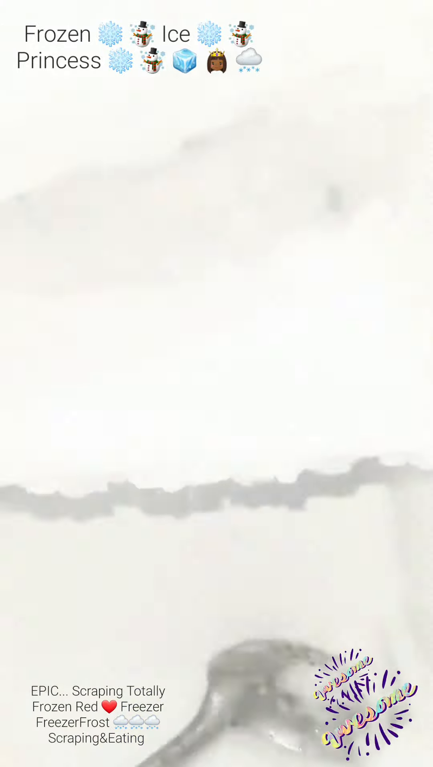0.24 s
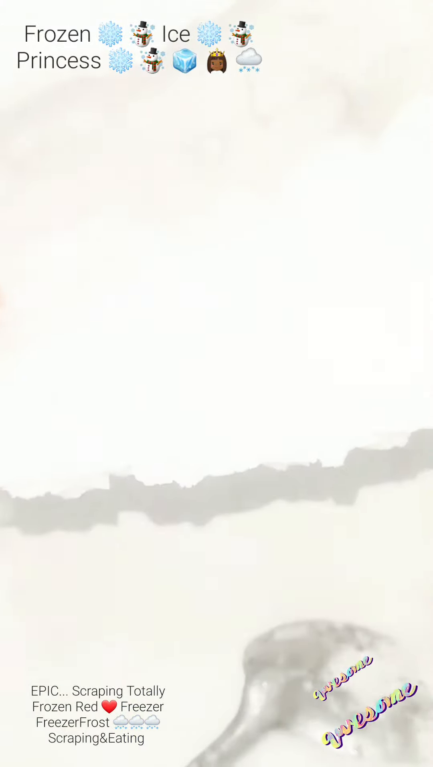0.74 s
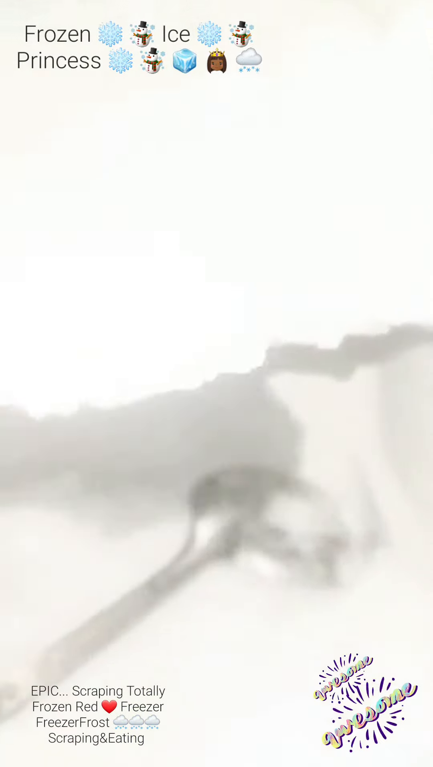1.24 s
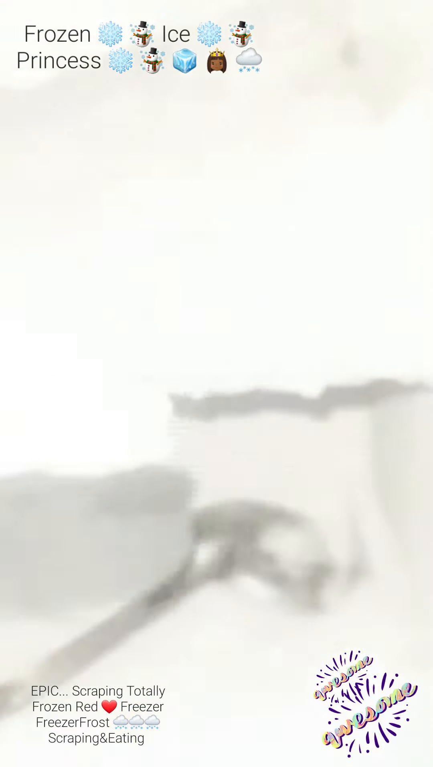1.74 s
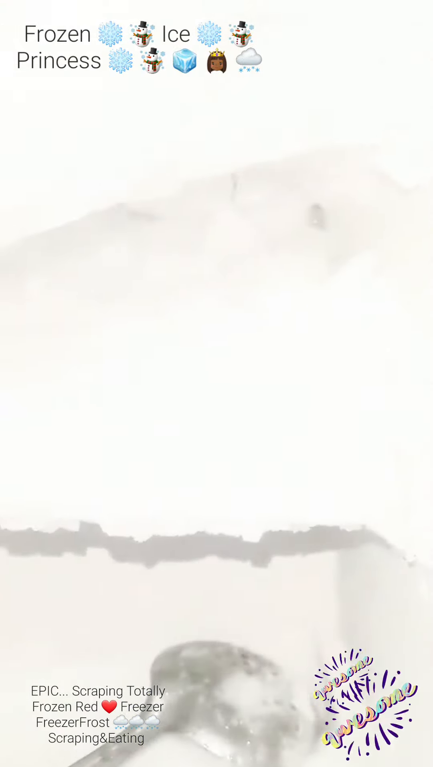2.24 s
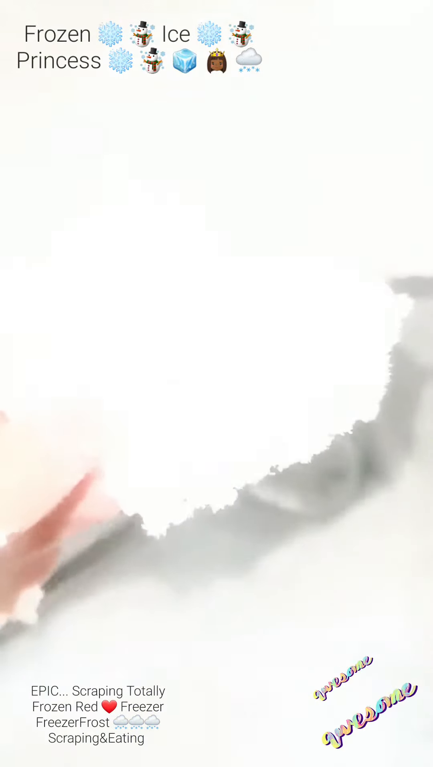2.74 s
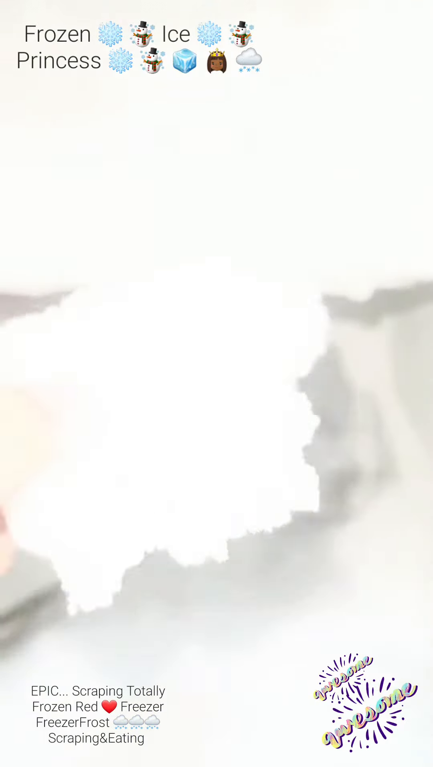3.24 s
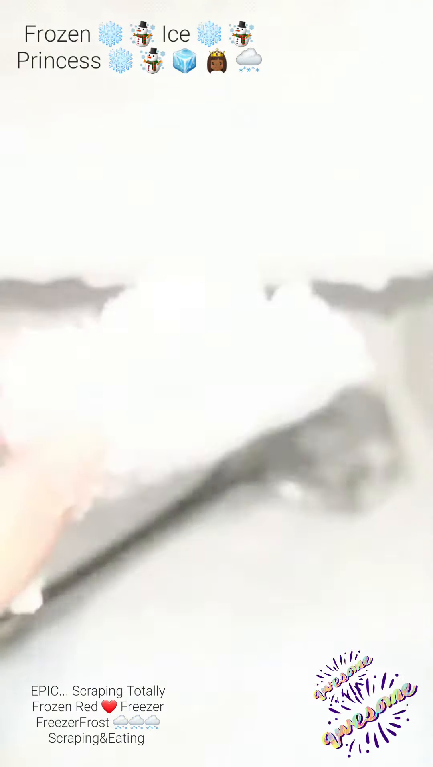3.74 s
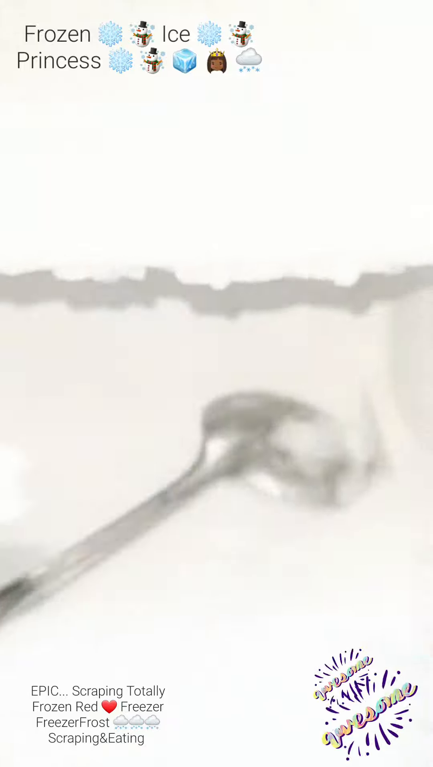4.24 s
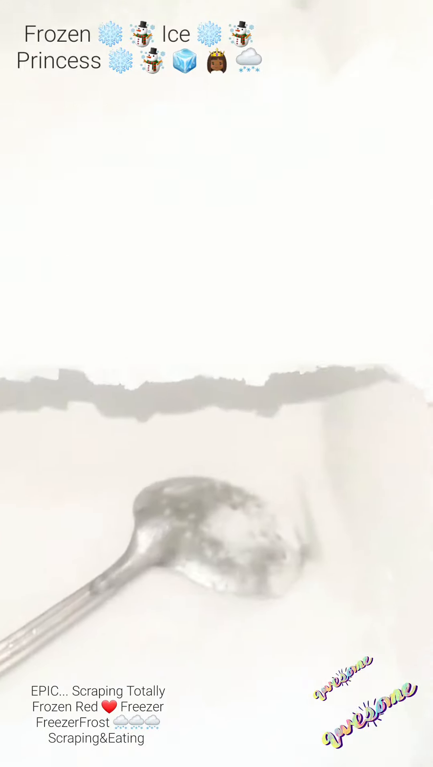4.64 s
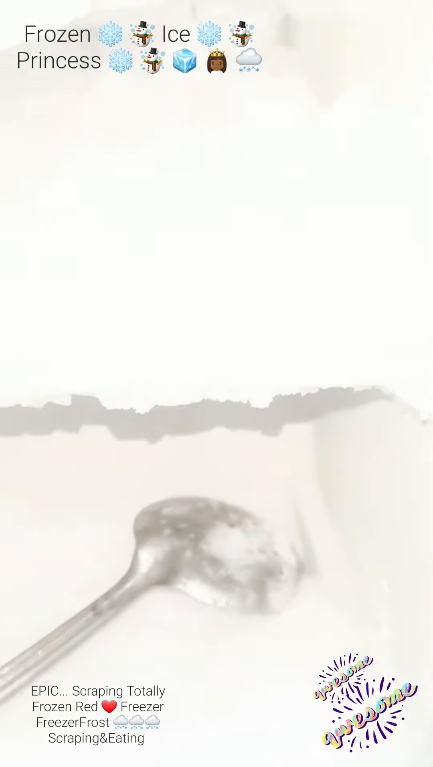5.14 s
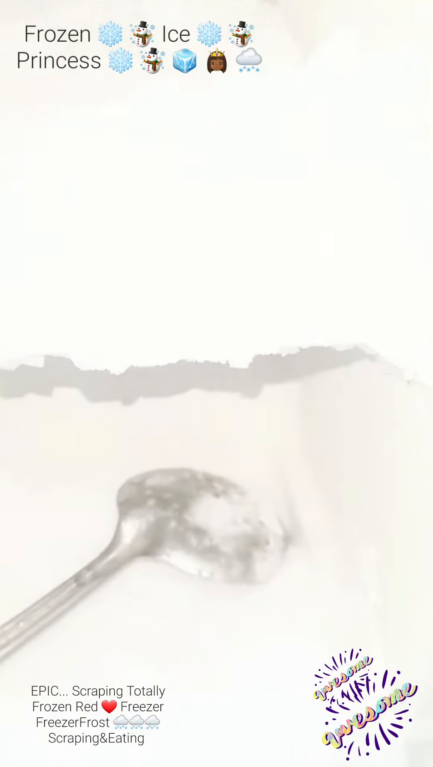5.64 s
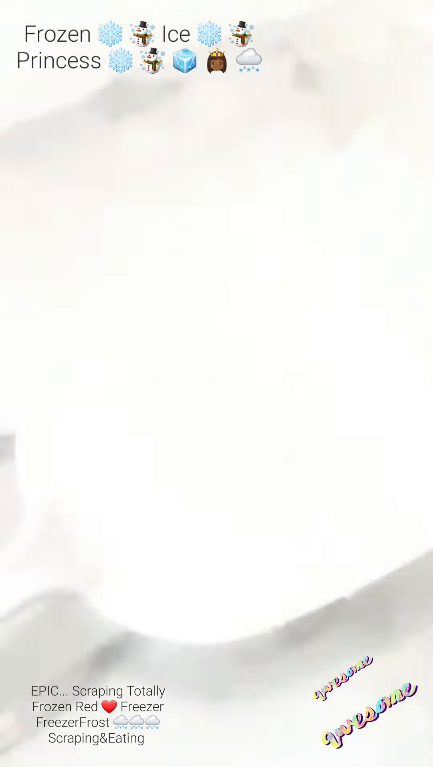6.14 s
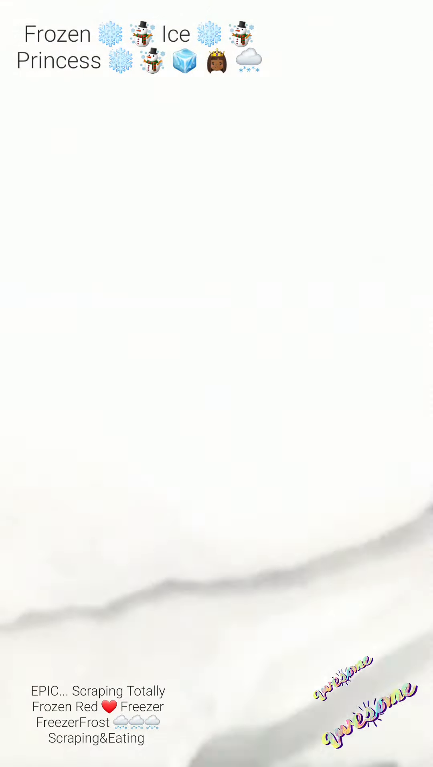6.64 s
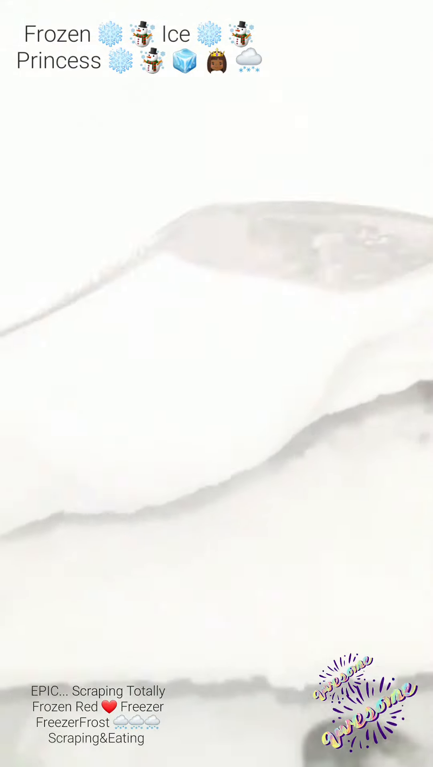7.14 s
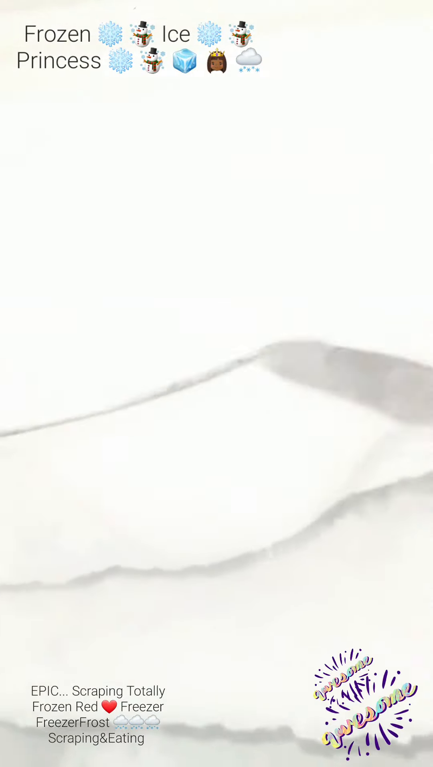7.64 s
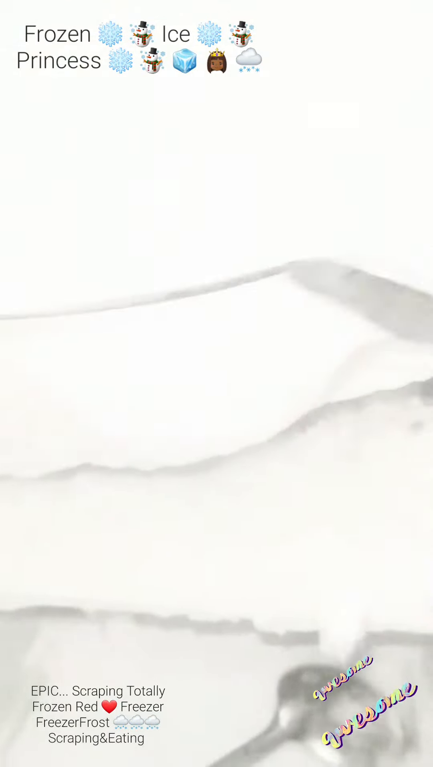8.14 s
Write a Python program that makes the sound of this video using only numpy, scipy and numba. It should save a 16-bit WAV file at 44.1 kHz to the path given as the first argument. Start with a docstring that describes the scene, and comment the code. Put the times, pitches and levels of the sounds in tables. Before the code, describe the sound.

Close to the microphone, a metal spoon works at thick freezer frost. It starts at once with a soft bump, chattering spoon taps and a crisp scrape, followed by a crunchy dig with a short squeak around 0.3-0.5 seconds. Activity thins from about 0.6 to 2, with a low wavering groan near 0.9, a light hiss near 1.1 and near quiet afterwards. From 2.1 the strokes return, quickening from 2.6 to 5.8: gritty crunches, brittle snaps, sprays of hissing crystals and small gliding squeaks, with tiny pauses. A strong crunch lands near 6.1, and shrill chirps cluster around 6.5. Low bumps come at 6.7 and 7.3. Hard chops strike the wall at 6.9, then repeatedly from 7.4 to the end, knocking, juddering and ringing dully. A faint freezer rush and thin, unsteady whine run throughout, with tight short reflections.

```python
"""Scraping frost in a freezer

A metal spoon scrapes thick frost, close to a phone, in quick strokes with short pauses.
Bursts of random clicks are the breaking ice: a hiss when it skims, a crunch when it digs.
Gliding tones squeak where packed frost slips. Towards the end hard chops ring the freezer wall.
Taps, bumps and a groan join in; filtered noise and a thin whine are the freezer, running throughout."""
import sys
import numpy as np
from scipy import signal
from scipy.fft import rfft, irfft
from scipy.io import wavfile
from scipy.ndimage import uniform_filter1d
from numba import njit

SR = 44100
rng = np.random.default_rng(int(sys.argv[2]) if len(sys.argv) > 2 else 0)


def wav_record(signal):
    """Record a signal, one row per channel, as 16-bit PCM in the file named by sys.argv[1]."""
    frames = np.transpose(np.atleast_2d(signal))
    bounded = np.clip(frames, -1, 1)
    # unit amplitude maps onto the largest positive 16-bit level
    quanta = np.round(bounded * 32767).astype(np.int16)
    wavfile.write(sys.argv[1], SR, quanta)


N = 370440  # length in samples
TIME = np.arange(N) / SR  # seconds


def undb(db):
    """Turn decibels into gain."""
    return 10 ** (np.asarray(db) / 20)


def unit(x):
    """Scale to an rms of 1."""
    return x / np.sqrt(np.mean(x ** 2))


def add(track, start_s, sound):
    """Mix a sound into the track from a given time."""
    start = max(int(start_s * SR), 0)
    part = sound[:max(N - start, 0)]
    track[start:start + len(part)] += part


def fade(t, t60):
    """Die away exponentially, losing 60 dB in t60 seconds."""
    return np.exp(-np.log(1000) * t / t60)


def walk(rate, size=N):
    """Wander at random around 0 with an rms of 1, through `rate` new points a second."""
    knots = rng.standard_normal(int(size / SR * rate) + 2)
    position = np.arange(size) / SR * rate
    return unit(np.interp(position, np.arange(len(knots)), knots))


def colour(x, points, size=2048):
    """Filter to a given spectrum without looking ahead; white noise keeps its power."""
    hz, db = np.transpose(points)
    grid = np.maximum(np.fft.rfftfreq(size, 1 / SR), 1)
    gain = undb(np.interp(np.log(grid), np.log(hz), db))
    # folding the cepstrum forward puts the filter's energy as early as possible
    cepstrum = irfft(np.log(gain))
    cepstrum[1:size // 2] *= 2
    cepstrum[size // 2 + 1:] = 0
    response = irfft(np.exp(rfft(cepstrum)))
    return signal.fftconvolve(x, response / np.linalg.norm(response))[:N]


def ring(modes, shift_hz=0):
    """A struck object sounds several fading tones at once, each moved by its shift."""
    t = TIME[:SR // 5, None]
    hz, t60, db = np.transpose(modes)
    tones = np.cos(2 * np.pi * (hz + shift_hz) * t)
    return np.sum(undb(db) * fade(t, t60) * tones, axis=1)


# Pieces of crust that snap off: start_s, crunch_db, hiss_db (before the frost colours)
CRUST_CRACKS = [(0.026, -17, -28.5), (0.091, -28, -24), (0.336, -15.5, -15.5), (0.429, -13, -38),
                (1.009, -29, -18), (1.256, -55, -42), (1.875, -39.5, -46), (1.888, -39.5, -54),
                (2.053, -38, -22), (2.088, -28, -32), (2.109, -19, -25), (2.389, -15.5, -27),
                (2.426, -44, -19), (2.813, -12.5, -20.5), (3.059, -23, -35), (3.081, -24.5, -32),
                (3.149, -10.5, -35), (3.413, -23, -27.5), (3.536, -16, -32.5), (3.845, -43, -26.5),
                (4.052, -25, -58), (4.163, -25.5, -33), (4.213, -20.5, -40), (4.538, -25, -20.5),
                (4.552, -18.5, -33), (4.632, -19, -20), (4.755, -30, -27), (4.803, -12.5, -20),
                (5.075, -29, -22), (5.222, -21.5, -25.5), (5.247, -29.5, -25), (5.353, -14, -20),
                (5.752, -19.5, -19), (5.973, -31.5, -38.5), (6.148, -51, -42), (6.217, -16, -30.5),
                (6.26, -18.5, -37), (6.293, -15.5, -20), (6.504, -16, -31), (6.643, -16.5, -41),
                (6.884, -27, -23), (7.356, -19, -20), (7.605, -19.5, -23), (7.845, -15.5, -35),
                (8.14, -17, -40), (8.289, -17, -27)]
# Ringing of the hard crust under a deep dig: pitch_hz, t60_s, level_db (relative)
CRUST_RING = [(690, 0.032, -7.5), (1386, .018, -2), (1760, 0.017, 3.5)]
# Colours of the deep grinding, the crunch and the hiss: frequency_hz, level_db (relative)
GRINDING_COLOUR = [(40, -28), (120, -16), (220, -3.5), (410, 4.5), (600, 1), (900, -5), (1300, -7.5),
                   (2500, -48.5)]
CRUNCH_COLOUR = [(350, -18), (700, -6), (1000, -1), (1350, 2.5), (1800, 2), (2300, 2), (3300, 1.5),
                 (4300, 1.5), (5000, -13), (7000, -12.5), (10000, -30), (16000, -32)]
HISS_COLOUR = [(1500, -24), (3500, -11), (5000, -14.5), (6500, -12), (8300, -10), (9400, -0.5), (10200, 1),
               (11200, -3.5), (12500, -12), (15500, -19.5)]


def frost():
    """The edge advances in tiny jerks; each jerk breaks coarse and fine crystals together."""
    grinding_db, crunch_db, hiss_db = effort()
    clumps = undb(2.3 * walk(rate=500)) * np.sqrt(jerks())
    coarse = grains(rate=2500, spread_db=2.0, clumps=clumps, even_s=0.021)
    fine = grains(rate=7000, spread_db=2.8, clumps=clumps, even_s=0.028)
    crunch = hollow(coarse + chips(), grinding_db - crunch_db) * undb(crunch_db - 7.0)
    hiss = fine * undb(hiss_db - 0.57)
    for start_s, snap_db, spray_db in CRUST_CRACKS:
        add(crunch, start_s, undb(snap_db) * fracture(t60=0.063, tail_db=-12.5))
        add(hiss, start_s, undb(spray_db) * fracture(t60=0.059, tail_db=0.5))
    grinding = coarse * undb(grinding_db)
    crust = ring(CRUST_RING)
    crust_sound = signal.fftconvolve(grinding, crust / np.linalg.norm(crust))[:N]
    body = undb(1.5) * colour(grinding, GRINDING_COLOUR) + undb(-3.5) * crust_sound
    return body + colour(crunch, CRUNCH_COLOUR) + colour(hiss, HISS_COLOUR)


# Strokes of the spoon: full_push_start_s, run_in_s, push_s, let_go_s,
# grinding_db, crunch_db, hiss_db (levels half-way through the push, before trims and colours)
SPOON_STROKES = [(0.0,.004,0.0092,0.1,-35.5,-24,-21.5), (.198,0.25,0.026,0.31,-80,-51.5,-46),
                 (.339,0.019,0.078,0.08,-35.5,-20,-17), (.395,.015,0.05,0.13,-26.5,-24,-32.5),
                 (.669,0.099,.006,0.4,-66,-42.5,-41.5), (.899,0.21,0.22,0.39,-54.5,-40.5,-29),
                 (1.115,0.036,0.0098,0.085,-61,-51,-28), (1.41,0.067,0.057,0.049,-64,-60,-56),
                 (1.92,0.17,0.12,.1,-59,-57,-55.5), (2.093,0.1,0.168,0.02,-46,-22.5,-18.5),
                 (2.316,0.085,0.062,0.41,-47.5,-27,-18), (2.609,0.088,0.0083,0.057,-28.5,-19.5,-21.5),
                 (2.67,0.008,0.028,.06,-45.5,-35,-32.5), (2.817,0.12,.1,0.046,-33,-17,-28),
                 (3.078,0.14,0.0039,0.0097,-42,-26,-33.5), (3.137,0.045,0.036,.11,-29,-13.5,-23.5),
                 (3.34,0.058,0.15,.08,-44,-35,-40.5), (3.417,0.034,0.085,0.082,-25,-15.5,-28.5),
                 (3.701,0.03,0.012,0.049,-25.5,-16.5,-28), (3.745,0.057,0.025,0.026,-47,-20.5,-25),
                 (3.851,0.015,0.046,0.028,-52,-31.5,-37), (3.94,0.037,0.036,0.084,-33.5,-15,-26),
                 (4.092,0.013,0.015,0.03,-36,-18,-26), (4.175,0.049,0.014,0.095,-33,-14.5,-21.5),
                 (4.325,0.087,0.033,0.27,-52,-38.5,-38.5), (4.425,0.042,0.0025,0.036,-29,-17.5,-24.5),
                 (4.535,0.0043,0.051,0.046,-61,-30,-29), (4.635,0.07,.03,0.1,-48,-15.5,-19),
                 (4.831,0.12,0.048,0.22,-37.5,-20.5,-15.5), (4.927,0.054,0.047,0.11,-63,-30,-18),
                 (5.08,0.04,0.0076,0.095,-59,-31.5,-20), (5.16,0.035,0.023,0.11,-34.5,-15,-19),
                 (5.353,0.014,0.049,0.07,-33.5,-17.5,-27), (5.445,0.2,0.092,0.027,-65,-44,-31.5),
                 (5.584,0.021,0.0025,0.02,-23.5,-16.5,-24), (5.7,0.18,0.039,0.14,-35,-20,-17),
                 (6.07,0.073,0.012,0.062,-28,-10.5,-22.5), (6.216,0.012,0.002,.031,-26.5,-19,-23.5),
                 (6.291,0.03,0.028,0.06,-41,-17,-20), (6.488,0.077,0.066,0.029,-46.5,-19,-23.5),
                 (6.581,0.0045,0.043,0.11,-51,-21,-24.5), (6.705,0.076,0.0059,0.032,-41,-37.5,-32.5),
                 (6.812,0.1,0.0093,0.034,-46,-26,-32), (7.094,0.082,0.092,.04,-48,-37,-26),
                 (7.197,0.066,0.0088,0.049,-24,-14,-26.5), (7.352,0.0058,0.0047,0.14,-67,-25,-21),
                 (7.71,0.054,0.0073,0.029,-47,-18,-23.5), (7.939,.047,0.011,0.15,-48,-22,-16.5),
                 (8.103,0.057,0.0098,0.11,-55,-40,-23.5)]
# Each of these three has the columns grinding_db, crunch_db, hiss_db:
# gained over a stroke's run-in and lost over its let-go
EDGE_CHANGE = (37, 33.5, 31.5)
# change over the push, as the edge sinks in
DIG_CHANGE = (4.5, -1, -2.5)
# level of loose frost settling between strokes
LOOSE_FROST = (-73, -71.5, -70.5)
CHOP_RUN_IN_S, CHOP_PUSH_S, CHOP_HISS_DB = 0.014, 0.055, -19.5


def effort():
    """Every stroke runs in, pushes deeper and lets go, giving three levels in dB; overlaps add up."""
    strokes = list(SPOON_STROKES)
    for start_s, let_go, _, grinding_db, crunch_db in WALL_CHOPS:
        levels = (grinding_db, crunch_db, CHOP_HISS_DB)
        strokes.append((start_s, CHOP_RUN_IN_S, CHOP_PUSH_S, let_go, *levels))
    t = TIME[::32]  # levels move slowly, so every 32nd sample is enough
    power = undb(LOOSE_FROST)[:, None] ** 2
    for start_s, run_in, push, let_go, *layer_db in strokes:
        before = np.maximum(start_s - t, 0) / run_in
        after = np.maximum(t - start_s - push, 0) / let_go
        depth = np.clip((t - start_s) / push, 0, 1) - 0.5
        stroke_db = np.array(layer_db)[:, None] + np.outer(DIG_CHANGE, depth)
        stroke_db = stroke_db - np.outer(EDGE_CHANGE, before + after)
        power = power + undb(stroke_db) ** 2
    return [np.interp(TIME, t, 10 * np.log10(layer)) for layer in power]


def jerks(rate=170, t60=0.033, stuck=0.5):
    """The edge sticks and breaks free unevenly: the crackle leaps up each time and dies away."""
    slips = (rng.random(N) < rate / SR) * rng.exponential(size=N)
    return stuck + signal.fftconvolve(slips, fade(TIME[:SR // 20], t60))[:N]


def grains(rate, spread_db, clumps, even_s):
    """Unequal snaps come in clumps; their power is evened out over even_s so the level follows the strokes."""
    chance, size = rng.random(N), rng.exponential(size=N)
    sign = rng.choice([-1, 1], N)
    snaps = (chance < rate / SR) * sign * undb(spread_db * np.minimum(size, 5)) * clumps
    width = max(int(even_s * SR), 2)
    power = uniform_filter1d(uniform_filter1d(snaps ** 2, width), width // 2)
    return snaps / np.sqrt(np.maximum(power, 0) + 1e-6)


def chips(rate=70, spread_db=2.5, size_db=16, hz=2300, t60=0.0029):
    """Coarser chips give way at random moments: each is a sharp click with a pitch of its own."""
    out, t = np.zeros(N), TIME[:SR // 150]
    for when, size, pitch in rng.random((int(rate * N / SR), 3)):
        chip_hz = hz * 4 ** (pitch - 0.5)  # up to an octave either way
        ping = np.cos(2 * np.pi * chip_hz * t) * fade(t, t60)
        ping[0] += 2  # the break itself
        level_db = size_db + spread_db * min(-np.log(1 - size), 3)
        add(out, when * N / SR, undb(level_db) * ping / np.linalg.norm(ping))
    return out


def fracture(t60, tail_db):
    """A piece breaks with a sharp snap of noise, plus a fading spray of fragments."""
    t = TIME[:SR // 10]
    snap = 2.2 * fade(t, 0.012)
    return rng.standard_normal(len(t)) * (snap + undb(tail_db) * fade(t, t60))


UPPER_GAP_HZ = 2050  # the air pocket's upper resonance lies this far above its lower one


def hollow(x, depth_db, open_hz=1354.0, deep_hz=700.0, upper_gain=0.094, sealed_gain=0.09):
    """The air pocket under the bowl resonates twice: lower in a dig, sharper where frost seals it."""
    hz = np.interp(depth_db, [-27, -5], [open_hz, deep_hz])
    sealed = np.zeros(N)
    for start_s, length, start_hz, end_hz, _ in FROST_SQUEAKS:  # the pocket follows each squeak
        start, size = int(start_s * SR), int(length * SR)
        hz[start:start + size] = np.linspace(start_hz, end_hz, size)
        sealed[start:start + size] = 1
    sealed = uniform_filter1d(sealed, SR // 100)
    wobble = np.exp(0.23 * (1 - sealed) * walk(rate=23))
    hz = uniform_filter1d(hz, SR // 100) * wobble
    damping = 0.42 - 0.26 * sealed
    bright, _ = resonator(x, hz, damping)
    _, upper = resonator(bright, hz + UPPER_GAP_HZ, damping / 2)
    return (bright + (upper_gain + sealed_gain * sealed) * upper) * (1 - 0.44 * sealed)


@njit
def resonator(x, hz, damping):
    """A resonance with a moving pitch; gives what lies above it (high) and around it (band)."""
    high, band = np.empty(len(x)), np.empty(len(x))
    band_state, low_state = 0., 0.
    for i in range(len(x)):
        g, k = np.tan(np.pi * hz[i] / SR), damping[i]
        v = (band_state + g * (x[i] - low_state)) / (1 + g * (g + k))
        low = low_state + g * v
        band_state, low_state = 2 * v - band_state, 2 * low - low_state
        high[i], band[i] = x[i] - k * v - low, v
    return high, band


def mirror(x, lag_s=0.0013, sway=0.4, share=0.6):
    """The frost face returns an echo at once; its delay shifts as the spoon moves, sweeping the colour."""
    lag = lag_s * SR * np.exp(sway * walk(rate=14))
    echo = x[np.maximum(np.arange(N) - lag.astype(int), 0)]
    return (x + share * echo) / np.hypot(1, share)


# Packed frost sticking and slipping under the spoon: start_s, length_s, start_hz, end_hz, level_db
FROST_SQUEAKS = [(.193, 0.0047, 5400, 5300, -32.5), (0.356, .11, 1260, 1227, -29),
                 (0.648, 0.041, 3960, 4100, -43), (0.828, 0.049, 3700, 3860, -43.5),
                 (2.737, 0.075, 700, 1134, -35), (3.024, 0.066, 2500, 3200, -54),
                 (3.105, 0.055, 1100, 632, -28.5), (3.393, 0.036, 790, 623, -27),
                 (3.87, 0.13, 1200, 1045, -31), (4.093, 0.021, 3840, 4420, -30),
                 (4.16, 0.051, 1471, 1272, -19), (4.62, 0.12, 1620, 1350, -25),
                 (5.352, 0.04, 4500, 4300, -21), (5.951, 0.034, 2065, 2440, -37),
                 (6.015, 0.075, 1600, 950, -24), (6.27, 0.0574, 1527, 1293, -21.5),
                 (6.493, 0.032, 3010, 3390, -25), (6.535, 0.029, 4030, 4270, -15),
                 (6.5788, 0.033, 4170, 3570, -13.5), (6.614, 0.059, 1186, 1313, -25),
                 (6.808, .02, 3610, 3500, -30), (6.928, 0.041, 1293, 1450, -17.5),
                 (7.086, 0.1, 1585, 1187, -26), (7.699, 0.029, 1050, 1235, -25),
                 (7.942, 0.022, 933, 860, -22.5)]


def squeaks(upper_jitter=0.0715, second_db=-14, upper_db=-10):
    """Frost sticks and slips in uneven cycles: hoarse gliding chirps, some with the pocket's upper tone."""
    out = np.zeros(N)
    for start_s, length, start_hz, end_hz, db in FROST_SQUEAKS:
        size = int(length * SR)
        hz = np.linspace(start_hz, end_hz, size)
        uneven_hz = hz * (1 + 0.07 * walk(start_hz * 0.6, size))
        upper_hz = (hz + UPPER_GAP_HZ) * (1 + upper_jitter * walk(start_hz, size))
        phase = 2 * np.pi * np.cumsum(uneven_hz) / SR
        upper_phase = 2 * np.pi * np.cumsum(upper_hz) / SR
        tone = np.sin(phase) + undb(second_db) * np.sin(2 * phase)
        if start_hz < 2000:  # shrill squeaks lie above the pocket
            tone += undb(upper_db) * np.sin(upper_phase)
        grip = np.hanning(size) ** 0.25 * undb(5 * walk(rate=350, size=size))
        add(out, start_s, undb(db) * unit(tone * grip))
    return out


# Chops that reach the wall: start_s, let_go_s, wall_db, grinding_db, crunch_db
# (grinding and crunch before trims and colours)
WALL_CHOPS = [(6.885, 0.15, -23, -38, -22.5), (7.416, 0.23, -20, -27.5, -18.5),
              (7.605, 0.27, -22.5, -27, -19), (7.795, .2, -23, -27.5, -20.5),
              (7.978, 0.16, -21, -27.5, -21.5), (8.139, 0.19, -19.5, -26, -28.5),
              (8.283, 0.2, -19.5, -27, -24.5)]
# Ringing of the frosted wall: pitch_hz (before detuning), t60_s, level_db (relative)
WALL_RING = [(100, 0.058, -8), (173, 0.03, -2.5), (260, 0.071, -4.5), (293, 0.13, -2.5), (484, 0.044, -8.5),
             (1085, 0.04, -12), (2430, 0.028, -4), (3390, 0.081, -13), (5350, 0.034, -5.5)]


def chops(dig_s=0.059, release_t60=0.12, detune_hz=9, flutter_db=3):
    """The spoon knocks the wall and judders along it; the shifting contact breaks up the ring."""
    out, t = np.zeros(N), TIME[:SR // 4]
    for start_s, _, db, *_ in WALL_CHOPS:
        wall = ring(WALL_RING, detune_hz * rng.standard_normal(len(WALL_RING)))
        judder = rng.standard_normal(len(t)) * fade(np.maximum(t - dig_s, 0), release_t60)
        judder[0] += 22  # the blow
        sound = signal.fftconvolve(judder, wall)
        sound = sound * undb(flutter_db * walk(rate=145, size=len(sound)))
        add(out, start_s, undb(db) * sound / np.std(sound[:SR // 10]))
    return out


# Taps that set the spoon ringing: start_s, level_db (before the ringing)
SPOON_TAPS = [(.001, -22), (.023, -20.5), (0.086, -24)]
# Ringing of the spoon: pitch_hz, t60_s, level_db (relative)
SPOON_RING = [(1190, 0.049, -4), (1924, 0.053, -4), (2630, 0.061, 7), (3230, 0.038, 0), (5410, 0.035, -4)]


def taps():
    """Light, chattering taps ring the spoon's fading tones."""
    out, t = np.zeros(N), TIME[:SR // 2]
    for start_s, db in SPOON_TAPS:
        chatter = rng.standard_normal(len(t)) * fade(t, 0.035)
        sound = signal.fftconvolve(chatter / np.linalg.norm(chatter), ring(SPOON_RING))
        add(out, start_s, undb(db) * sound)
    return out


# Soft bumps on the cabinet: start_s, pitch_hz, rise_s, t60_s, level_db
CABINET_BUMPS = [(.0, 120, 0.0064, 0.071, -22), (6.675, 113, 0.026, 0.15, -24),
                 (6.706, 149, 0.00436, 0.016, -10.5), (6.886, 107, 0.014, 0.22, -25),
                 (7.299, 122, 0.0042, 0.057, -9.5)]


def bumps():
    """Soft bumps give the cabinet a few low swings that swell and die away."""
    out, t = np.zeros(N), TIME[:SR // 2]
    for start_s, hz, rise, t60, db in CABINET_BUMPS:
        swell = np.minimum(t / rise, 1) * fade(np.maximum(t - rise, 0), t60)
        add(out, start_s, undb(db) * swell * np.sin(2 * np.pi * hz * t))
    return out


def rub(hz=145, jitter=0.135):
    """Something drags along the cabinet: a low, wavering groan."""
    times_s = [0.6, 0.7, 0.82, 0.92, 0.97, 1.03]
    db = np.interp(TIME, times_s, [-84, -45.5, -45.0, -35.5, -36.0, -101])
    wavering_hz = hz * (1 + jitter * walk(rate=100))
    return undb(db) * np.sin(2 * np.pi * np.cumsum(wavering_hz) / SR)


def compartment(x, t60, wet_db):
    """The frosted walls send back dense, short reflections, modelled as fading noise."""
    t = TIME[:SR // 4]
    response = rng.standard_normal(len(t)) * fade(t, t60) * (t > 0.002)
    return undb(wet_db) * signal.fftconvolve(x, response / np.linalg.norm(response))[:N]


# Colour of the freezer's rush: frequency_hz, level_db (relative)
RUSH_COLOUR = [(30, -16), (110, -8), (190, -1.5), (320, -6.5), (700, -16), (2400, -21), (4200, -34),
               (6000, -41), (10000, -52), (14000, -48)]
RUSH_DB, WHINE_HZ, WHINE_DB = -52, 2309, -60  # the middles of their wanderings


def freezer():
    """The running freezer makes a soft wavering rush of coloured noise and a thin unsteady whine."""
    rush = unit(colour(rng.standard_normal(N), RUSH_COLOUR)) * undb(RUSH_DB + walk(rate=1.4))
    unsteady_hz = WHINE_HZ * (1 + 0.012 * walk(rate=300))
    whine = np.sin(2 * np.pi * np.cumsum(unsteady_hz) / SR)
    return rush + undb(WHINE_DB + 2 * walk(rate=4.7)) * whine


def scene():
    """Everything sits in the centre; only a trace of the reflections differs between the ears."""
    near = mirror(frost()) + squeaks() + chops() + taps() + bumps() + rub()
    mid = near + compartment(near, t60=0.031, wet_db=-10) + freezer()
    side = compartment(near, t60=0.03, wet_db=-28)
    return np.array([mid + side, mid - side])


TOP_HZ = 15900  # the sound has almost nothing above this


def record(dry):
    """The deepest bass is dropped, the highest peaks rounded and the top cut."""
    bass_cut = signal.butter(1, 30, "high", fs=SR, output="sos")
    top_cut = signal.ellip(10, 0.2, 80, TOP_HZ, fs=SR, output="sos")
    sound = signal.sosfilt(bass_cut, dry)
    rounded = 0.9 * np.tanh(sound / 0.9)
    return signal.sosfilt(top_cut, rounded)


dry = scene()
out = record(dry)
wav_record(out)
```